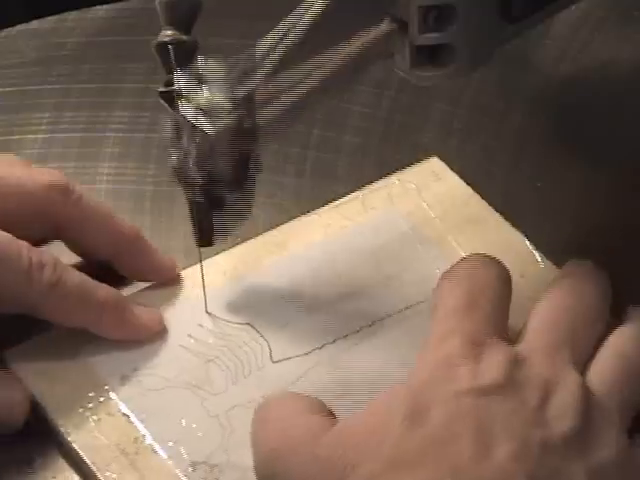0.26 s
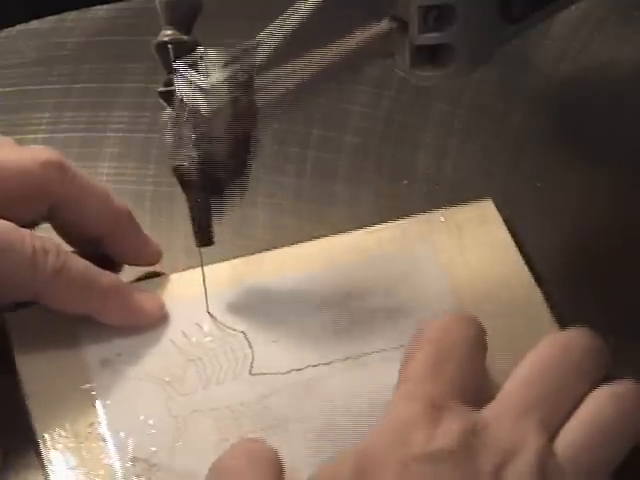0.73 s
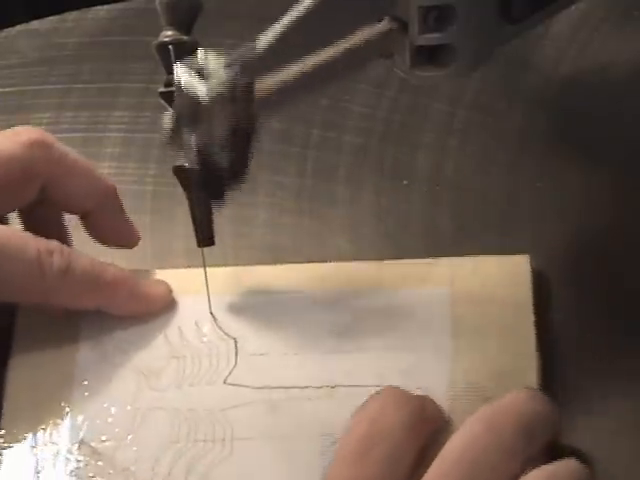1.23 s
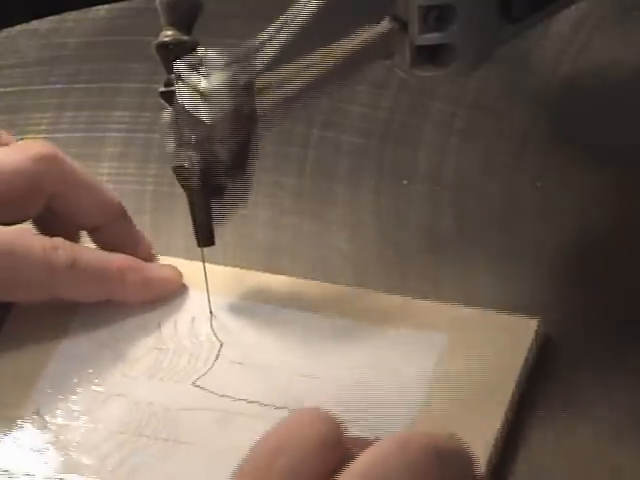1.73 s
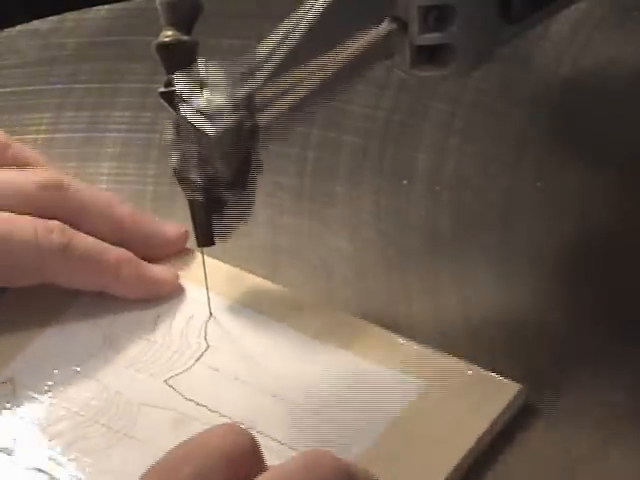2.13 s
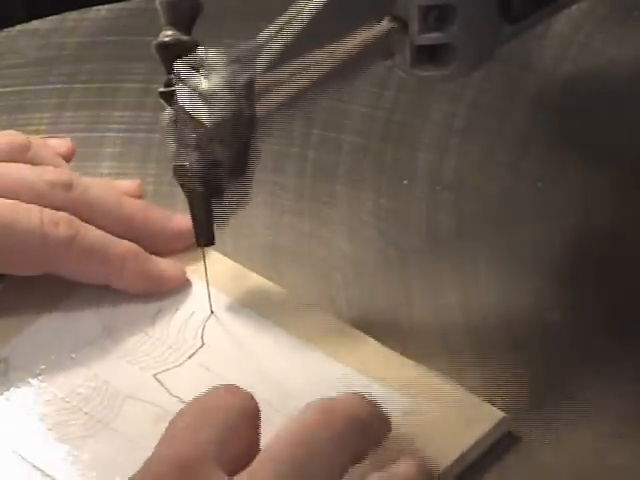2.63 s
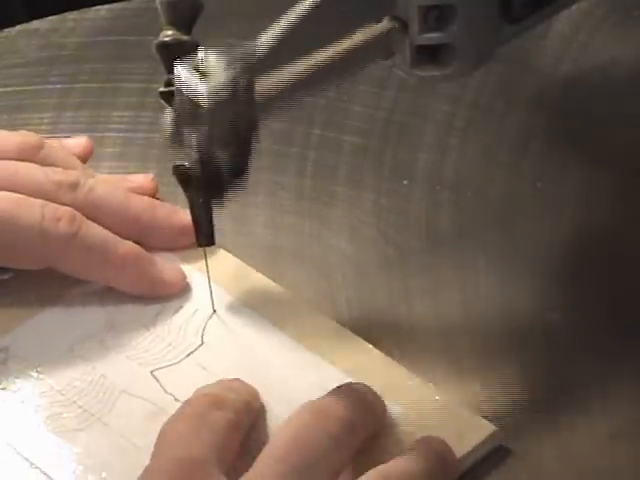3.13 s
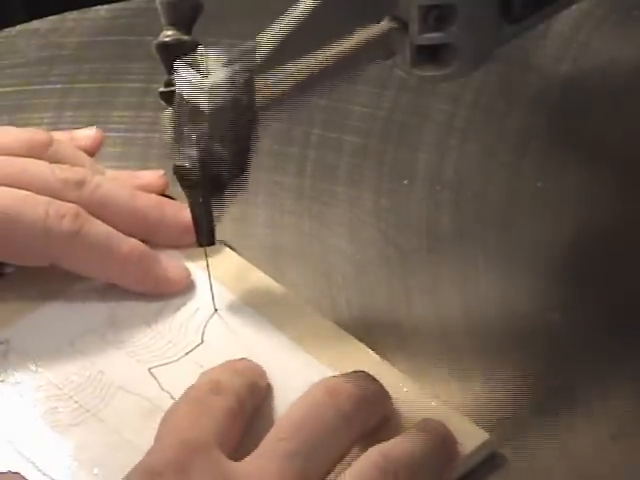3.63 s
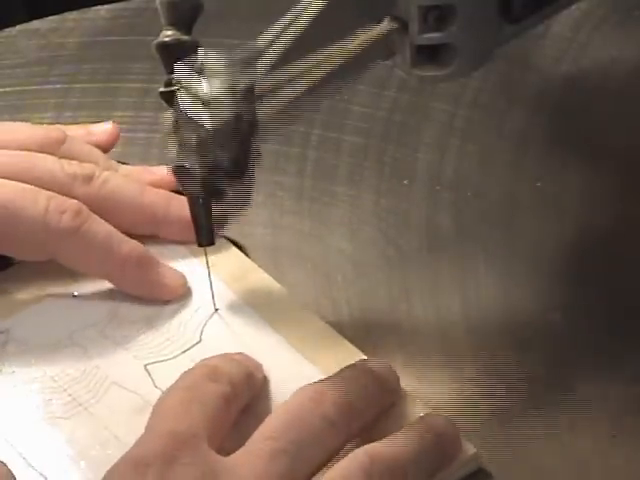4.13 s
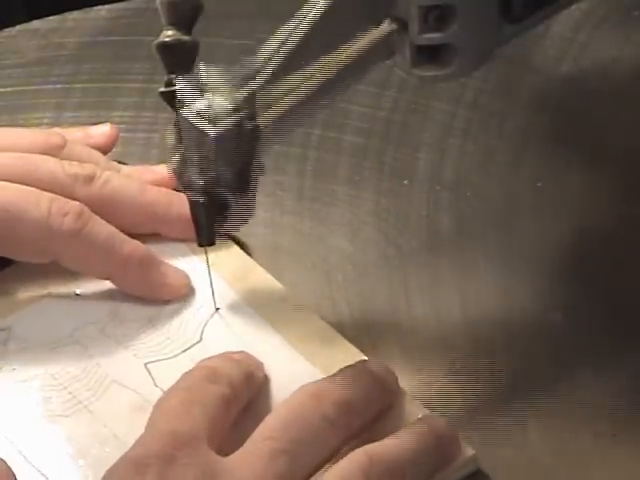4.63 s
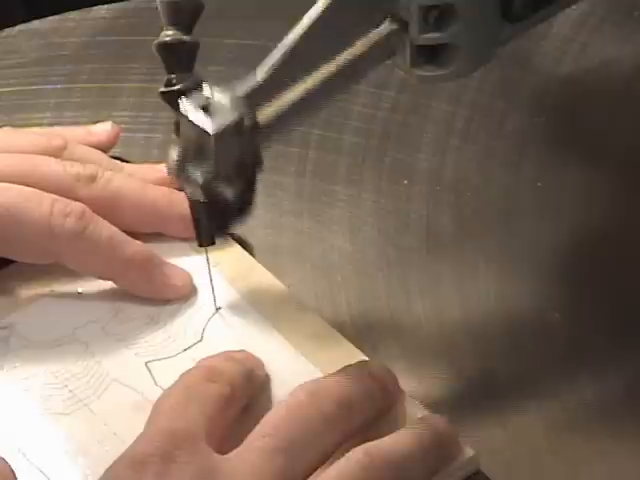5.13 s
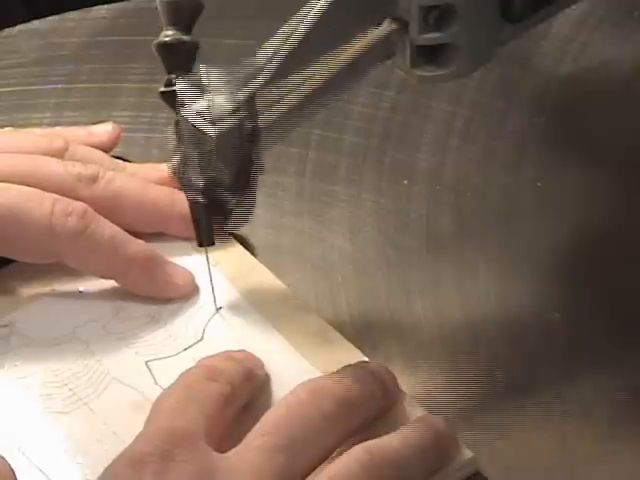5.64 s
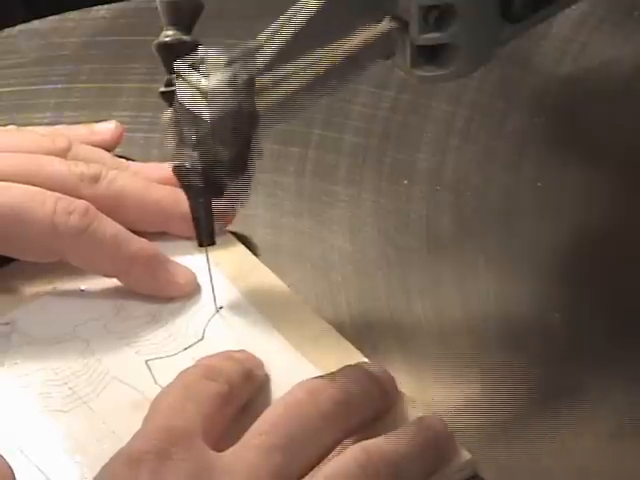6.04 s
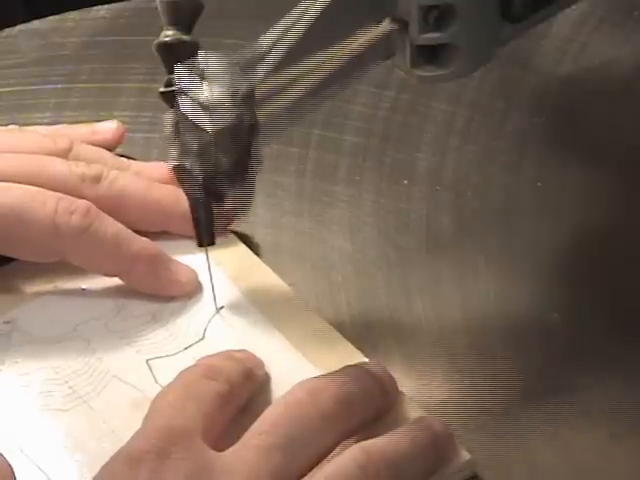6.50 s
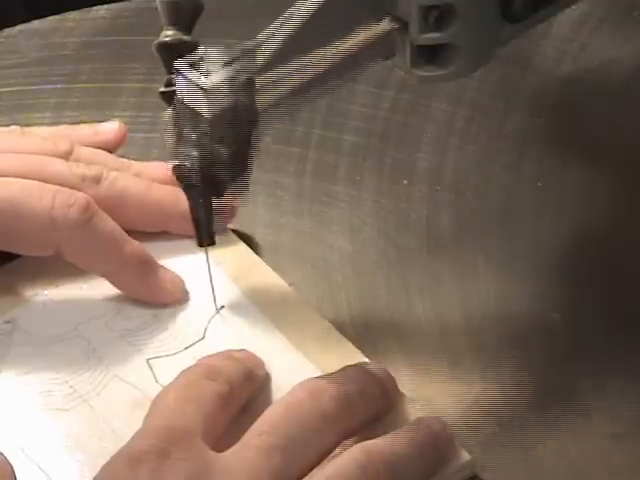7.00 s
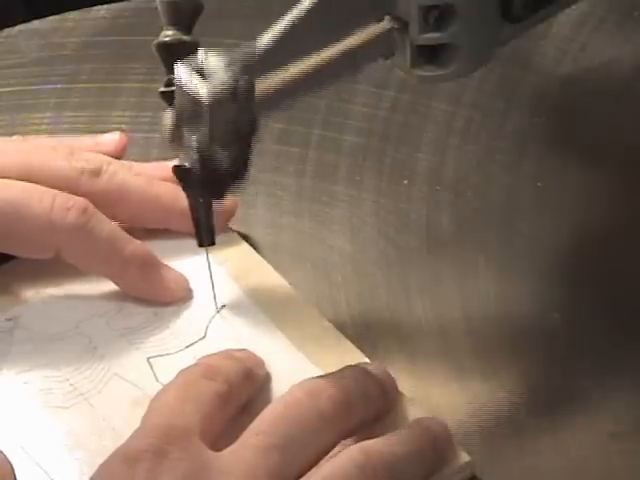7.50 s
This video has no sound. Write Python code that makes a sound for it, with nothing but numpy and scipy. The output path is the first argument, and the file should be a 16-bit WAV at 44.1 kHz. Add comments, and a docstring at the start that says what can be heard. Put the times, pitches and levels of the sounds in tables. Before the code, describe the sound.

A motor-driven saw makes a rapid, fluttering buzz with tonal whine and small linkage ticks. The work turns against the blade, scrapes and knocks once early on, then the sound sinks for a moment and returns. Around three seconds it settles into harsher, grainy metallic cutting that continues evenly to the end. Small room with short reflections, stereo microphone near the machine.

```python
"""A humming, scraping scroll saw strokes about 14 times a second, its blade in a plywood and metal stack.
Teeth click past at the swinging blade speed and ring the work; the linkage ticks, the frame rattles and sings.
Just before 1 s the work catches and knocks, then the whole level dips and recovers; near 3 s the blade
settles into metal. Noise patterns return nearly alike with the strokes. Small workshop, close stereo microphone."""
import sys
import numpy as np
from scipy import signal
from scipy.fft import rfft, irfft, next_fast_len
from scipy.io import wavfile

SR = 44100
rng = np.random.default_rng(int(sys.argv[2]) if len(sys.argv) > 2 else 0)


def to_linear_factor(level_db):
    """Convert decibel levels (scalar or array-like) to linear amplitude factors."""
    exponent = np.asarray(level_db, float) / 20
    return 10 ** exponent


def generate_wav(signal):
    """Clip the signal to [-1, 1] and save it as 16-bit WAV at the path in sys.argv[1]."""
    frames = np.transpose(np.atleast_2d(signal))
    scaled = np.clip(frames, -1, 1) * 32767
    pcm = np.round(scaled).astype(np.int16)
    wavfile.write(sys.argv[1], SR, pcm)


N = 342216

STROKE_HZ = 13.7136
TURN_AT = 0.16  # part of the stroke where the blade starts down
TEETH_HZ = 1619.4  # nominal tooth rate at mid stroke
# blade halt at the top: part of stroke, width [strokes], share of force lost
STILL_AT, STILL_WIDTH, STILL_SHARE = 0.138, 0.024, 0.7
THROB_AT = 0.2  # part of the stroke where neighbouring frame tones add up
# the blade rubs while the work turns, then settles into the metal: share of cutting metal before, after
ENTER_S, SETTLE_S, TURNING, CUTTING = 2.64, 0.58, 0.55, 0.83
LOAD_S, LOAD_LENGTH_S = 3.1, 0.14  # the motor takes the load of the cut
UNEVEN_DB = 1.94  # spread of each swell from stroke to stroke
SLACK_DB = -32.5  # scrape level below which the linkage hardly ticks
# shares of power returning (every stroke, every fourth, when the drive's pulsing is back in step)
FRAME_RETURNS, TEETH_RETURNS, EDGE_RETURNS = (0.5, 0.33), (0.5, 0.3), (0.15, 0.35)
DRIFT = 0.985  # likeness of a returning pattern to its last return

# crank running ahead or behind with the load: (time [s], lead [strokes])
LEAD_STROKES = [(0.1, 0.027), (0.9, 0.012), (1.4, 0.022), (2.9, -0.01), (4.1, 0.014), (5.3, 0.012),
                (7.7, -0.005)]
# overall loudness and bite of the teeth, with a dip near 1.1 s: (time [s], loudness [dB], bite level [dB])
SAW_DB = [(0.0, -32.5, -30), (0.6, -27, -32), (0.88, -27, -23), (0.95, -27.5, -36), (1.08, -37, -50),
          (1.33, -39, -43), (1.62, -32.5, -24), (1.9, -32, -24), (2.3, -31, -30), (2.52, -32, -32.5),
          (2.85, -29, -16.5), (3.12, -33.5, -21.5), (3.4, -32, -18), (4.7, -31.5, -16.5),
          (6.1, -31.5, -15.5), (6.5, -30, -13), (7.0, -31.5, -15.5), (7.76, -31.5, -14)]
# bright rasp: (time [s], relative level [dB])
RASP_DB = [(0, -32), (.4, -29.5), (.7, -27), (.86, -26), (.96, -28.5), (1.08, -36), (1.34, -35.5),
           (1.62, -27.5), (1.95, -29), (2.48, -30.5), (2.75, -29.5), (3.2, -28.5), (3.8, -25), (4.5, -26.5),
           (5.5, -25), (6.5, -24.5), (7.76, -25)]
# rings of blade, metal sheet and table: (frequency [Hz], width [Hz], gain [dB])
WORK_MODES = [(1250, 12, 9), (1327.7, 41, 17), (1415, 32, 4.5), (1501, 36.7, 10.5), (1562.7, 31, 6.5),
              (1871, 21, 1), (2682, 23, 10.5), (2803, 53, 7.5), (2877, 19, 3), (3710, 190, 0.5),
              (5900, 530, -2), (5970, 350, 0.5)]
# pass band of the low rings: (low edge [Hz], high edge [Hz])
LOW_BAND_HZ = [1256, 1650]
# Force swells over a steady rub: (part of stroke, relative level [dB], rise [strokes], fall [strokes])
# blade force on the main rings of the work
BITE_SWELLS = [(.16, 14.6, 0.025, 0.076), (0.25, 12.2, 0.058, 0.042), (0.359, 20.4, 0.047, 0.017),
               (.56, 7, .03, .05), (.78, 1.6, 0.18, 0.024)]
# same columns; the lower rings take their force earlier in the down stroke
BITE_EARLY_SWELLS = [(.22, 22.4, 0.06, 0.031), (.32, 12.9, .03, 0.043), (.6, 8, .05, .06),
                     (.76, 3.9, 0.045, 0.02)]
# same columns; rasp in metal
RASP_METAL_SWELLS = [(.2, 2.5, 0.06, 0.091), (0.32, 3.7, 0.056, 0.24), (.85, 1.7, 0.079, 0.12)]
# same columns; rasp while the work turns
RASP_TURNING_SWELLS = [(.19, 14.8, 0.037, 0.038), (.32, 2.7, 0.01, 0.15), (.77, 6.2, 0.041, 0.12),
                       (.87, 2.6, 0.04, 0.031)]
# same columns; jolts of the arm shaking the frame
JOLT_SWELLS = [(.02, 0, .03, 0.027), (.21, 0.5, 0.053, 0.049), (.57, -1.5, 0.039, 0.065),
               (.8, -2, 0.08, .05)]
# linkage play taken up: (part of stroke, relative level [dB])
TICKS_DB = [(0.183, -2.5), (0.322, 7.5), (0.521, -12), (0.776, 1), (0.86, 3)]
# blade scraping in the metal: (frequency [Hz], density [dB per Hz])
SCRAPE_SPECTRUM_DB = [(1000, -15), (1500, 10), (1760, -7.5), (2150, -11.5), (2520, 0.5), (3100, 1),
                      (3740, -4.5), (4350, -5), (4900, -0.5), (5650, -16), (6630, -6.5), (7970, -16.5),
                      (8680, -14.5), (9250, -31), (10100, -18), (11200, -35), (12500, -19.5), (13500, -30),
                      (14500, -66)]
# blade rubbing while the work turns: (frequency [Hz], density [dB per Hz])
RUB_SPECTRUM_DB = [(1030, -45), (1750, -2.5), (1990, -13.5), (2340, 3.5), (2510, -1), (2820, 2),
                   (3470, 1.5), (3710, 1), (4680, 0), (5640, 2.5), (7420, -7.5), (9190, -21.5),
                   (9920, -20.5), (10900, -28.5), (12200, -24), (12900, -32), (13500, -43)]
# frame rattle: (frequency [Hz], density [dB per Hz])
RATTLE_SPECTRUM_DB = [(15, -64), (25, -20), (43, -25), (75, -22.5), (115, -19.5), (160, -14), (225, -21),
                      (262, -13), (320, -13), (407, -8), (520, -11), (600, -10.5), (655, -8.5), (741, -7.5),
                      (830, -6.5), (950, -10.5), (1130, -11), (1330, -8.5), (1560, -11.5), (1750, -7),
                      (2210, -20.5), (3740, -120)]
# singing tones of the table and frame, rising and falling separately: (time [s], level of each of six [dB])
TONES_DB = [(0.05, -31.5, -39.5, -30.5, -48, -39, -38), (0.25, -30, -37, -35, -44, -61.0, -29),
            (0.5, -30.5, -46, -30, -44, -38, -30), (0.65, -31.5, -38, -26, -56.0, -42, -26),
            (0.82, -33, -44, -24, -33, -35, -22.5), (0.93, -34, -32, -26, -29, -33, -22),
            (1.04, -40, -58, -54.0, -48, -53, -33.5), (1.12, -46, -47, -49, -37, -59, -38),
            (1.3, -39, -45.5, -39, -34.5, -47, -43), (1.5, -40, -43.5, -35, -32.5, -38, -30.5),
            (1.73, -40, -43, -33.5, -33.5, -38, -38), (1.97, -40, -47, -31.5, -35, -42, -28.5),
            (2.15, -40.0, -43, -29, -40.0, -48.5, -38), (2.3, -38, -61.5, -43, -32, -57, -29.5),
            (2.5, -39, -44, -33.5, -49, -51, -39), (2.7, -39, -43, -36, -31, -49.0, -32),
            (2.93, -45, -47, -33, -40.0, -35, -25.5), (3.15, -51, -47, -34, -36, -49, -33.5),
            (3.4, -48, -46, -39.5, -38, -53, -56), (4, -45.0, -47.5, -34.5, -41, -41.5, -54),
            (4.5, -43.5, -47, -35, -49, -41.5, -45.0), (5, -40.5, -44, -40, -52, -38.5, -51.5),
            (6, -39.5, -41.5, -35.5, -67, -42, -65), (7, -41, -42, -39, -45.0, -40, -51),
            (7.7, -40, -41.5, -36, -38, -38, -46.0)]
# frequencies of the six tones: (multiple of the stroke rate)
TONE_MULTIPLES = [7, 15, 30, 31, 34, 35]
# low tones locked to the stroke: (multiple of the stroke rate, relative level [dB])
HUM_DB = [(10, -12.5), (11, -13), (13, -8)]
# whine; the quarters come from the drive's pulsing, 35 times in four strokes: (multiple of the stroke rate)
WHINE_MULTIPLES = [9.75, 14.75, 23.75, 29, 29.75, 36, 37, 40, 43, 47, 48, 76, 80, 90, 160.72]
# whine against the overall loudness: (running light [dB], under load [dB])
WHINE_DB = [(-15.5, -25.5), (-21, -15), (-8.5, -13), (-3, -13.5), (-18, -13.5), (-12.5, -2), (-14, -21.5),
            (-31, -9.5), (-7.5, -14.5), (-5, -12.5), (-10, -8.5), (-17, -4.5), (-24, -5), (-16, -4),
            (-18, -6)]
# the work catches and slaps the table: (time [s], relative level [dB], t60 [s])
CATCHES = [(0.887, 3.497, 0.3)]
# knocked board: (frequency [Hz], width [Hz], gain [dB])
BOARD_MODES = [(1250, 48, 31), (1050, 200, 1), (1430, 61, 30), (3320, 300, -17)]
# squeak of the jamming blade: (frequency [Hz], width [Hz], gain [dB])
SQUEAK_MODES = [(2363, 73, -2), (2940, 110, -11), (3400, 110, -12)]
# where the table radiates little: (frequency [Hz], width [Hz])
HOLLOWS_HZ = [(1775, 230), (2030, 37), (2280, 51), (3330, 96), (4260, 116), (4800, 160)]
# colour of the side signal: (frequency [Hz], gain [dB])
SIDE_SPECTRUM_DB = [(25, -9), (60, -28), (110, -9.5), (200, -9), (370, -11), (680, -6), (1250, -8.5),
                    (2290, -7), (4190, -10), (7690, -17.5), (11000, -1), (14100, -24)]


def evened(x):
    """Scales to rms 1."""
    return x / np.sqrt(np.mean(x ** 2) + 1e-20)


def curve(rows, column):
    """One column of a time table at every sample."""
    rows = np.array(rows)
    return np.interp(np.arange(N) / SR, rows[:, 0], rows[:, column])


def ramp(start_s, length_s):
    """Climbs from 0 to 1."""
    return np.clip((np.arange(N) / SR - start_s) / length_s, 0, 1)


def colour(x, points):
    """Filters by a spectrum in dB, interpolated over log frequency."""
    size = next_fast_len(N + 4096)
    hz, db = np.transpose(points)
    bin_hz = np.fft.rfftfreq(size, 1 / SR)
    gain = to_linear_factor(np.interp(np.log(bin_hz + 1), np.log(hz + 1), db))
    return irfft(rfft(x, size) * gain, size)[..., :N]


def bandpass(x, order, band_hz):
    """Butterworth band pass."""
    return signal.sosfilt(signal.butter(order, band_hz, "band", fs=SR, output="sos"), x)


def ring(x, modes):
    """Sum of two-pole resonances, each of peak gain given in dB."""
    out = 0
    for hz, width_hz, db in modes:
        pole = np.exp((-np.pi * width_hz + 2j * np.pi * hz) / SR)
        out = out + to_linear_factor(db) * signal.lfilter([1 - abs(pole)], [1, -pole], x).imag
    return out


def recurring(columns, alike):
    """Normal numbers, a row a stroke, each row like the row before by correlation alike."""
    draw = rng.standard_normal((round(N / SR * STROKE_HZ) + 42, columns))
    return signal.lfilter([np.sqrt(1 - alike ** 2)], [1, -alike], draw, axis=0)[40:]


def returning(columns, shares):
    """Normal numbers, a row a stroke: one pattern for all strokes, one for every fourth, and a fresh part."""
    each, fourth = shares
    draw = rng.standard_normal((3, round(N / SR * STROKE_HZ) + 402, columns))
    keep = np.sqrt(1 - DRIFT ** 2)
    a = signal.lfilter([keep], [1, -DRIFT], draw[0], axis=0)
    b = signal.lfilter([keep], [1, 0, 0, 0, -DRIFT ** 2], draw[1], axis=0) * np.sqrt(1 + DRIFT ** 2)
    mixed = np.sqrt(each) * a + np.sqrt(fourth) * b + np.sqrt(1 - each - fourth) * draw[2]
    return mixed[400:]


def stroke_noise(turns, shares):
    """Noise that partly repeats with the strokes."""
    size = round(SR / STROKE_HZ)
    return returning(size, shares)[turns.astype(int), (turns % 1 * size).astype(int)]


def force(turns, swells, depth=1):
    """Gain over the stroke: steady rub plus uneven swells, less near the halt, raised to depth."""
    gain, uneven_db = 1, UNEVEN_DB * returning(len(swells), TEETH_RETURNS)
    for n, (part, db, rise, fall) in enumerate(swells):
        centred = turns - part + 0.5
        away = centred % 1 - 0.5
        own_db = uneven_db[centred.astype(int), n]
        gain = gain + to_linear_factor(db + own_db / depth) * np.exp(np.minimum(away / rise, -away / fall))
    from_halt = (turns - STILL_AT + 0.5) % 1 - 0.5
    still = np.exp(-(from_halt / STILL_WIDTH) ** 2)
    return evened(gain ** depth * (1 - STILL_SHARE * still))


def hum(turns):
    """Low steady tones locked to the stroke, following the level of the first frame tone."""
    tones = sum(to_linear_factor(db) * np.cos(2 * np.pi * (k * turns + rng.random())) for k, db in HUM_DB)
    return to_linear_factor(curve(TONES_DB, column=1) + 3.0) * tones


def frame_tones(turns):
    """Table and frame sing on multiples of the stroke, in phase once a stroke."""
    out = 0
    for n, k in enumerate(TONE_MULTIPLES):
        level = to_linear_factor(curve(TONES_DB, n + 1)) * np.sqrt(2)
        out = out + level * np.cos(2 * np.pi * k * (turns - THROB_AT))
    return out


def whine(turns, loudness_db, load):
    """Stroke-locked whine whose balance shifts as the motor takes the load."""
    out = 0
    for k, (light_db, loaded_db) in zip(WHINE_MULTIPLES, WHINE_DB):
        gain = to_linear_factor(light_db + (loaded_db - light_db) * load)
        out = out + gain * np.cos(2 * np.pi * (k * turns + rng.random()))
    # loudest shortly before the blade turns at the top
    flutter = 1 + 0.067 * np.cos(2 * np.pi * (turns - 0.08))
    return to_linear_factor(loudness_db) * out * flutter


def frame_rattle(turns, loudness_db):
    """A rattle that repeats with the stroke and throbs with the arm's jolts."""
    rattle = stroke_noise(turns, FRAME_RETURNS) * force(turns, JOLT_SWELLS)
    return to_linear_factor(loudness_db + 6.0) * evened(colour(rattle, RATTLE_SPECTRUM_DB))


def teeth(turns, bite_db, metal):
    """One click per tooth crossing the work, each with its own set and sharpness, rings the work."""
    travel = TEETH_HZ / (2 * np.pi * STROKE_HZ)
    place = travel * (1 - np.cos(2 * np.pi * (turns - TURN_AT)))
    down = np.diff(place, prepend=0) > 0
    tooth = place.astype(int)
    crossing = np.diff(tooth, prepend=0) != 0
    seat = turns.astype(int), tooth + 64 * down
    clicks = evened(crossing * (1 + 0.3 * returning(128, TEETH_RETURNS)[seat]))
    clicks = signal.sosfilt(signal.butter(2, 700, "high", fs=SR, output="sos"), clicks)
    edges = evened(crossing * (0.2 + returning(128, EDGE_RETURNS)[seat]))
    grit = rng.standard_normal(N)
    # metal gathers the force in the down stroke; rubbing while turning spreads it and roughens it
    drive, rub = clicks + (1.5 - 1.6 * metal) * grit, 0.62 * (1 - metal)
    low = ring(drive * (metal * force(turns, BITE_EARLY_SWELLS) + rub), WORK_MODES[:2])
    low = low + ring(drive * (metal * force(turns, BITE_SWELLS) + rub), WORK_MODES[2:5])
    low = bandpass(low, 3, LOW_BAND_HZ)
    push = force(turns, RASP_METAL_SWELLS, depth=1.9)
    high = ring((edges + 0.49 * grit) * push, WORK_MODES[5:10]) + ring(grit * push, WORK_MODES[10:])
    high = bandpass(high, 2, [1850, 7000])
    return to_linear_factor(bite_db - 3.5) * (low + (1.36 * metal - 0.3) * high) / low.std()


def linkage_ticks(turns):
    """Play taken up at the same places of each stroke: sharp ticks with short noisy tails."""
    strokes = np.arange(int(turns[-1]) + 1)[:, None]
    part, db = np.transpose(TICKS_DB)
    jitter_strokes = 0.0016 * recurring(len(TICKS_DB), alike=0.16)[:len(strokes)]
    at = np.searchsorted(turns, strokes + part + jitter_strokes)
    spread_db = 1.7 * recurring(len(TICKS_DB), alike=0.99)[:len(strokes)]
    train = np.zeros(N + 1)
    np.add.at(train, at, to_linear_factor(db + spread_db) * (at > 0))
    tails = signal.lfilter([1], [1, -np.exp(-1 / (0.0016 * SR))], train[:N])
    return 13.0 * train[:N] + 8.2 * tails * rng.standard_normal(N)


def kerf_hiss(turns, metal):
    """Grainy noise of the blade sliding in its kerf, swelling with its force."""
    chips = to_linear_factor(2.5 * np.minimum(rng.exponential(1, N), 4)) * rng.standard_normal(N)
    in_metal = metal * force(turns, RASP_METAL_SWELLS)
    in_turning = (1 - metal) * force(turns, RASP_TURNING_SWELLS)
    return evened(chips) * (in_metal + in_turning)


def ticks_and_hiss(turns, level_db, metal):
    """Linkage ticks over kerf hiss, their shared colour passing from rub to scrape."""
    slackness = 1 + to_linear_factor(2 * (SLACK_DB - level_db))
    # ticks all but vanish in the metal
    drive = (1 - 1.223 * metal) * linkage_ticks(turns) / slackness + kerf_hiss(turns, metal)
    cut = ramp(ENTER_S, SETTLE_S)
    scrape = cut * evened(colour(drive, SCRAPE_SPECTRUM_DB))
    rub = np.sqrt(1 - cut ** 2) * evened(colour(drive, RUB_SPECTRUM_DB))
    return to_linear_factor(level_db + 3.0) * (scrape + rub)


def catch():
    """A short bright scrape and squeak, then a rough knock through the board's resonances."""
    t, burst, scrape = np.arange(N) / SR, 0, 0
    for at_s, db, t60_s in CATCHES:
        age_s = np.maximum(t - at_s, 0)
        onset = np.clip((age_s - 0.004) / 0.013, 0, 1)
        burst = burst + to_linear_factor(db - 15.5) * onset * to_linear_factor(-60 * age_s / t60_s)
        scrape = scrape + to_linear_factor(db - 21.5) * np.minimum(age_s / 0.001, 1) * np.exp(-(age_s / 0.031) ** 4)
    a, b, c = rng.standard_normal((3, N))
    knock = burst * evened(ring(a, BOARD_MODES))
    squeak = to_linear_factor(2.5) * evened(ring(c, SQUEAK_MODES))
    return knock + scrape * (evened(colour(b, RUB_SPECTRUM_DB)) + squeak)


def hollowed(x, share):
    """Takes out a share of the sound at each frequency where the table radiates little."""
    for hz, width_hz in HOLLOWS_HZ:
        x = x - share * signal.lfilter(*signal.iirpeak(hz, hz / width_hz, fs=SR), x)
    return x


def echoes(x, t60_s):
    """Sparse reflections of random sign that die away, cut off at half a second."""
    t = np.arange(SR // 2) / SR
    present = (rng.random(len(t)) < 3000 / SR) * (t > 0.0005)
    taps = rng.choice([-1., 1.], len(t)) * present * to_linear_factor(-60 * t / t60_s)
    return signal.oaconvolve(x, taps / np.linalg.norm(taps))[:N]


def scene():
    """The saw, the workshop's tail, and reflections that differ between the two sides."""
    turns = 1 + STROKE_HZ * np.arange(N) / SR + curve(LEAD_STROKES, 1) - 0.012
    loudness_db, bite_db = curve(SAW_DB, column=1), curve(SAW_DB, column=2)
    metal = TURNING + (CUTTING - TURNING) * ramp(ENTER_S, SETTLE_S)
    scrape_db = curve(RASP_DB, column=1) - 1 + 2 * metal  # stronger in metal
    load = ramp(LOAD_S, LOAD_LENGTH_S)
    sung = hum(turns) + frame_tones(turns) + whine(turns, loudness_db, load)
    saw = frame_rattle(turns, loudness_db) + teeth(turns, bite_db, metal)
    saw = saw + ticks_and_hiss(turns, scrape_db, metal) + catch()
    saw = hollowed(saw, share=0.85)
    mid = sung + saw + to_linear_factor(-13) * echoes(saw, t60_s=0.073)
    side = to_linear_factor(-16.0) * echoes(saw, t60_s=1.0) + to_linear_factor(1.5) * echoes(saw, t60_s=0.066)
    side = side + to_linear_factor(-17) * np.roll(sung, 40)
    side = colour(side, SIDE_SPECTRUM_DB)
    return np.array([mid + side, mid - side])


def low_pass(x):
    """Removes everything above the highest recorded frequency."""
    return signal.sosfilt(signal.butter(12, 14710, fs=SR, output="sos"), x)


def record(dry):
    """The microphone leans to the right and cuts the deep bass; peaks are rounded, the top is cut."""
    lean_db = 1.57  # right over left
    leaning = dry * to_linear_factor([[-lean_db / 2], [lean_db / 2]])
    leaning = signal.sosfilt(signal.butter(2, 45, "high", fs=SR, output="sos"), leaning)
    rounded = 1.338 * np.tanh(leaning / 1.427)
    mix = signal.sosfilt(signal.butter(10, 13050, fs=SR, output="sos"), rounded)
    return low_pass(mix)


dry = scene()
out = record(dry)
generate_wav(out)
```